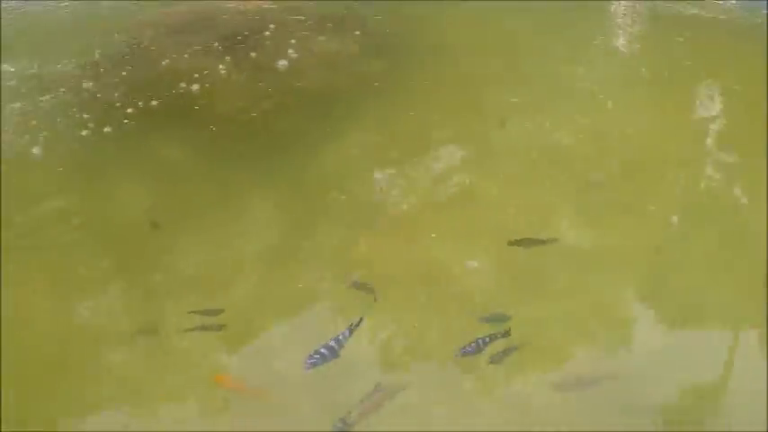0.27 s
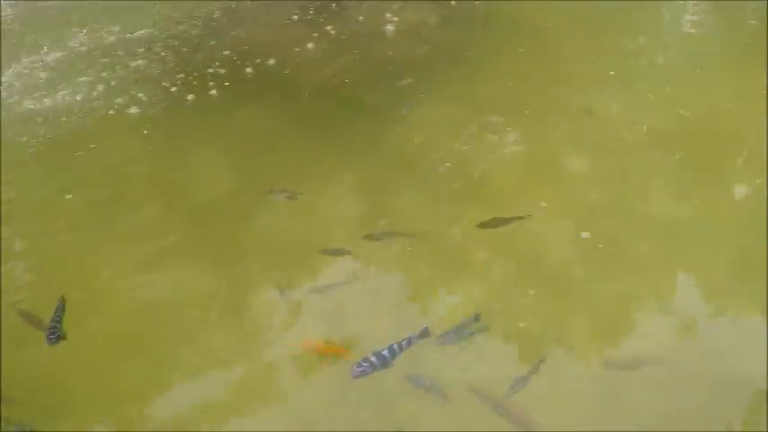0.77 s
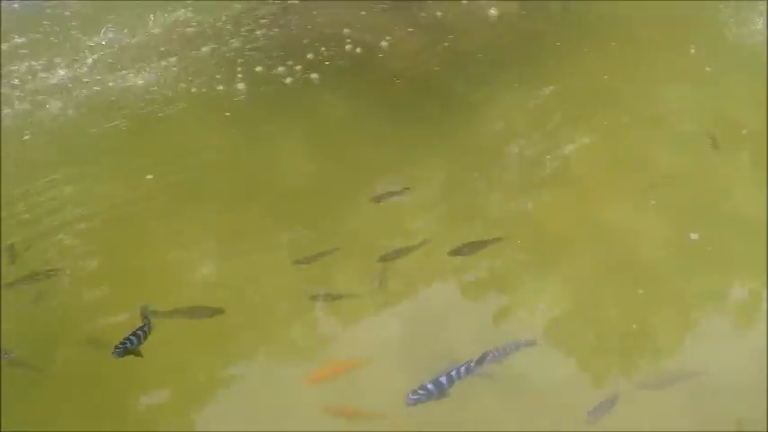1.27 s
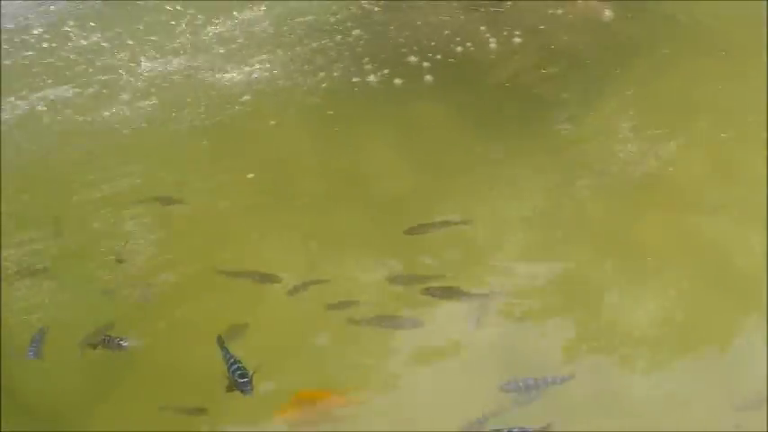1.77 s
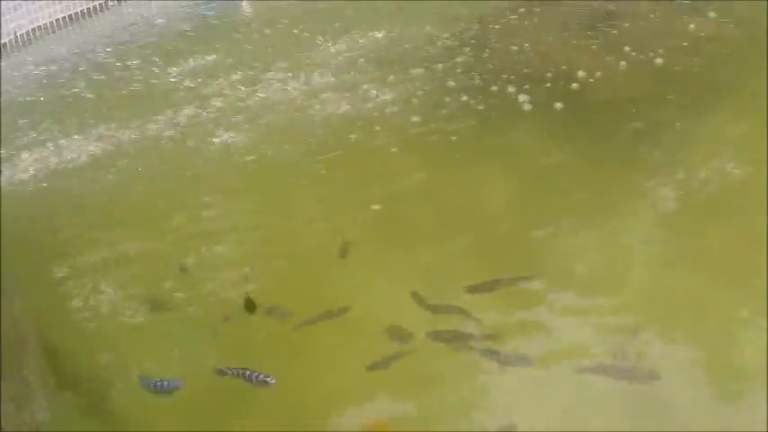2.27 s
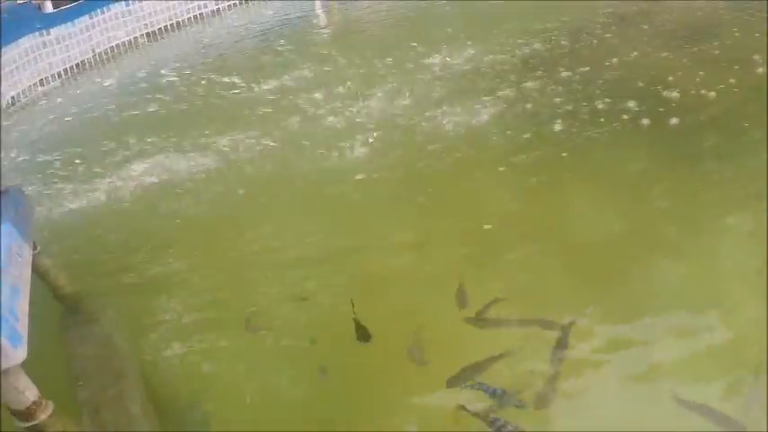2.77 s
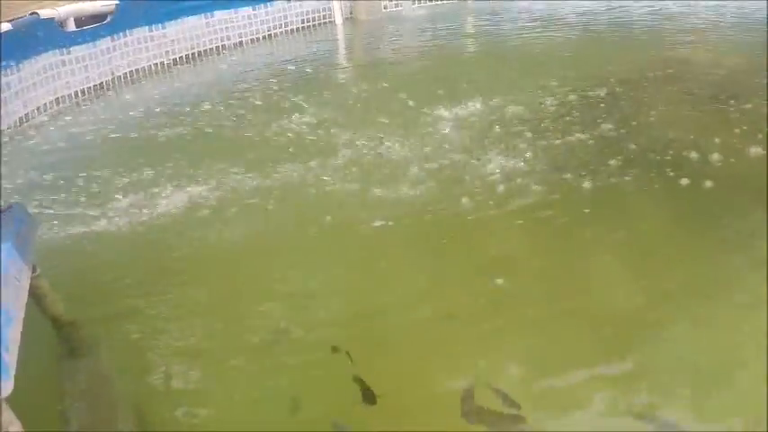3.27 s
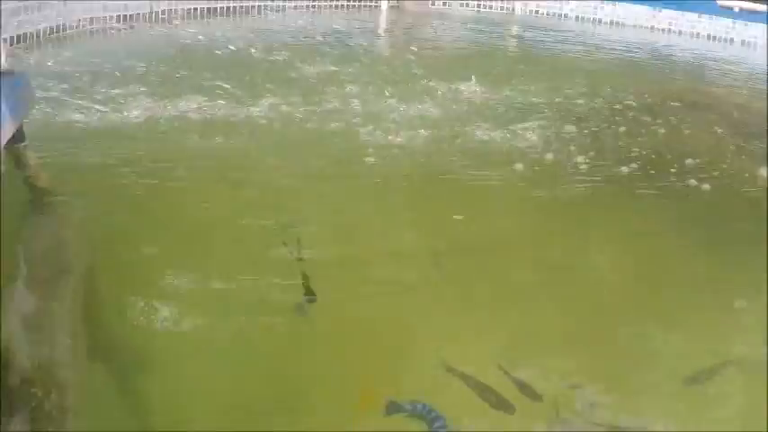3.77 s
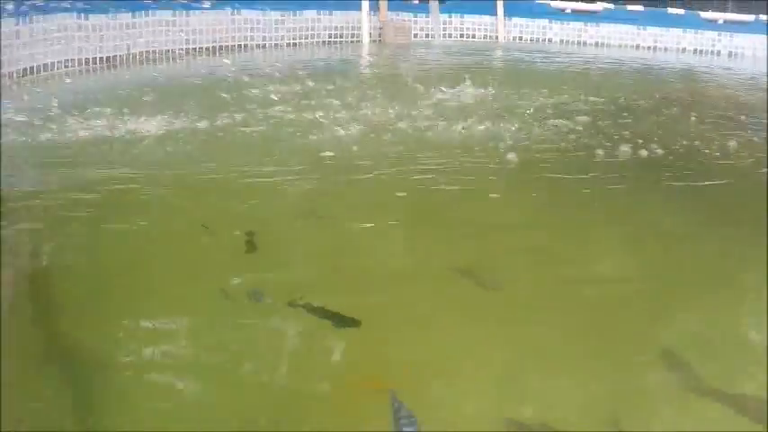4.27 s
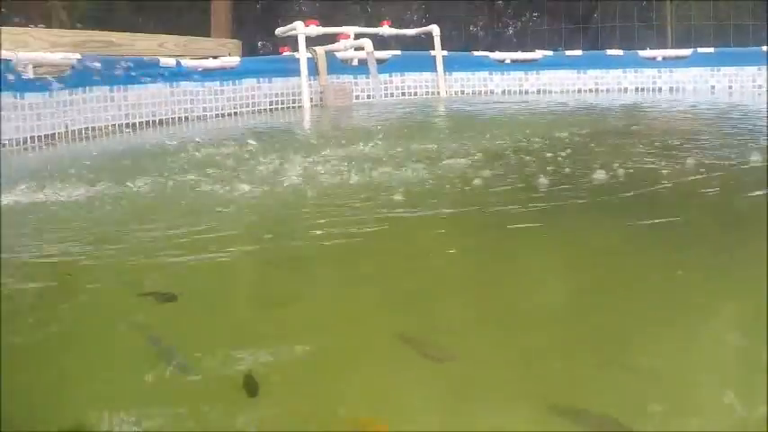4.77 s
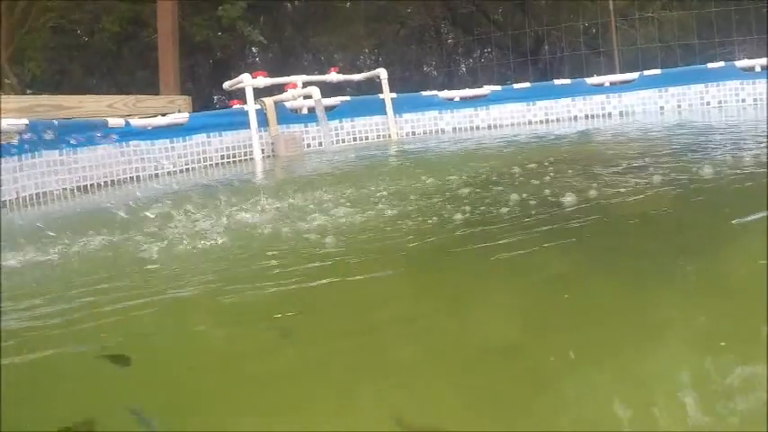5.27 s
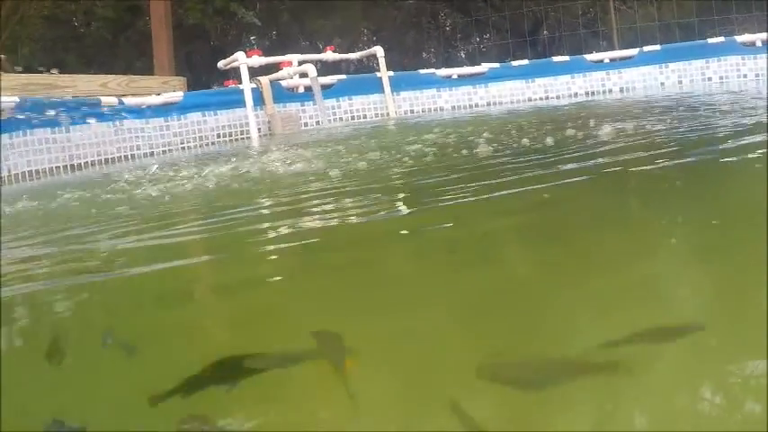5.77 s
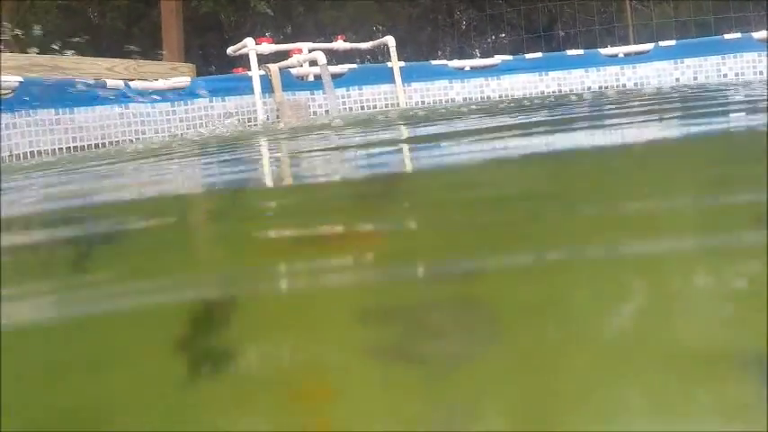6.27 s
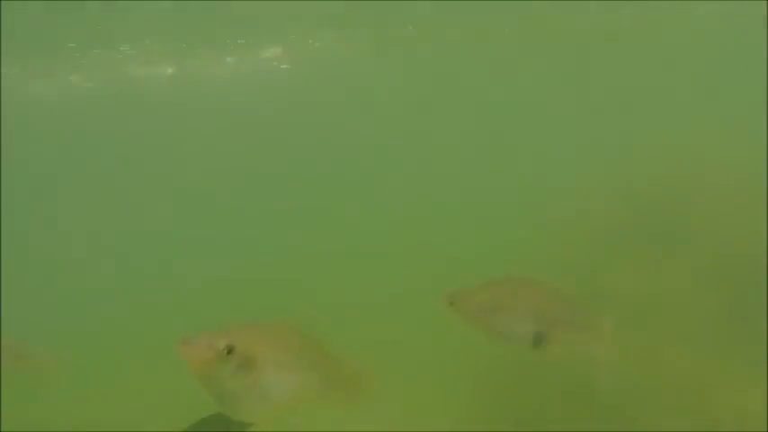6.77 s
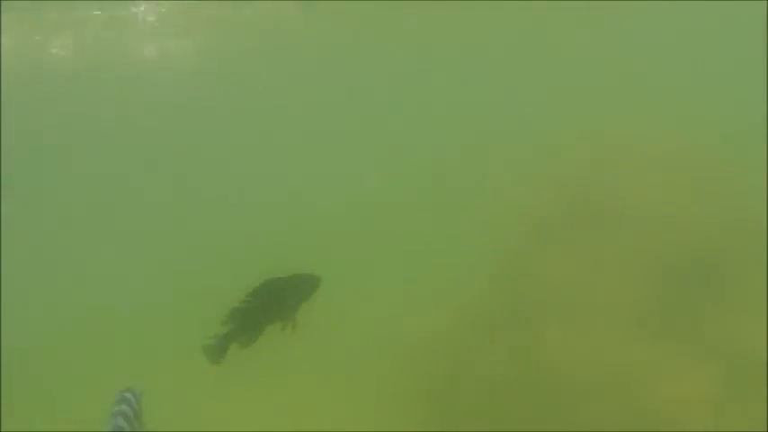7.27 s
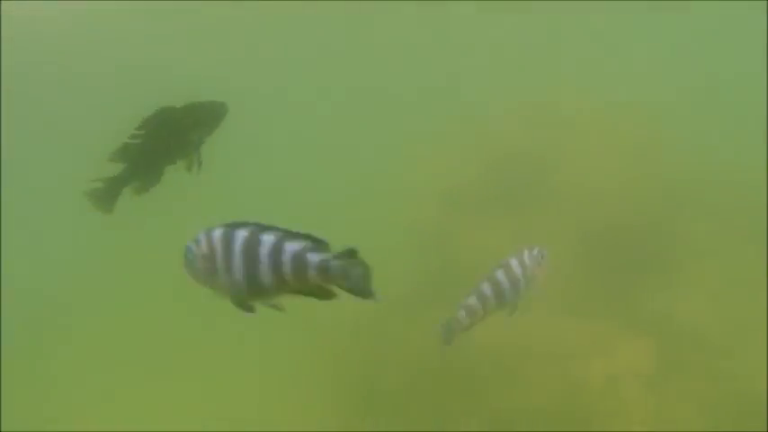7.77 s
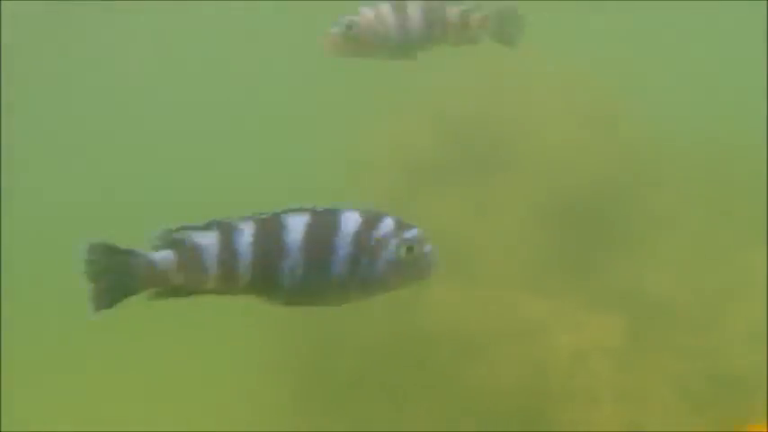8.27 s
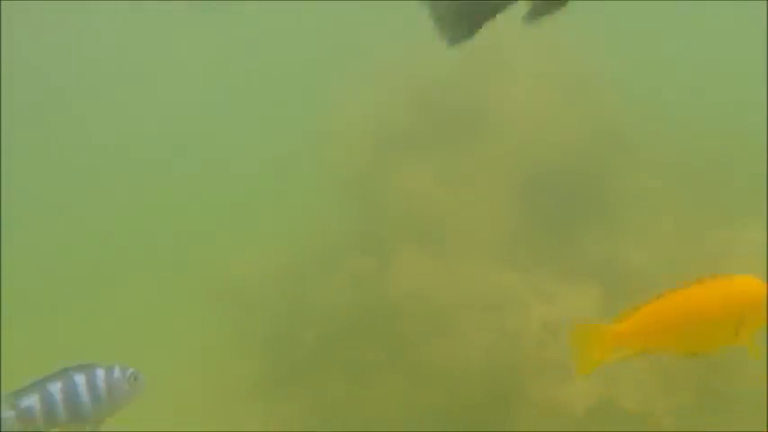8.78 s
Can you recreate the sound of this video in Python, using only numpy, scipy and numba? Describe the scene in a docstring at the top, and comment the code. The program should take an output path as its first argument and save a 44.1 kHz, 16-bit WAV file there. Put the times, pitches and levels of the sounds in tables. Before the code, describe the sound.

Quiet pond splashing and handling thumps build to a hard slapping, gurgling plunge, then dull underwater rumble with soft bubbles and a few knocks.

```python
"""A hand-held pole sways, shakes and knocks as it lowers a small camera in a sealed plastic case into a pond.
Sines and low noise make the pole; each knock is a thump, panel ring and crack in the case's modes.
Splashing from pipes is shaped noise and ringing drops, skin rubs in tiny slips and a far pump hums.
Water slaps, snaps and gurgles as noise bursts and blips; short rising tones are bubbles, case rings and a snap.
Below, the panels ring lower and the splash is dull."""
import sys
import numpy as np
from scipy import signal
from scipy.fft import rfft, irfft, next_fast_len
from scipy.io import wavfile
from numba import njit

SR = 44100
rng = np.random.default_rng(int(sys.argv[2]) if len(sys.argv) > 2 else 0)


def bounce(signal):
    """Save signal as a 16-bit WAV file at the path given by the first command-line argument."""
    frames = np.transpose(np.atleast_2d(signal))
    limited = np.clip(frames, -1, 1)
    pcm = np.round(limited * 32767).astype(np.int16)
    wavfile.write(sys.argv[1], SR, pcm)


N = 397341
T = np.arange(N) / SR

# All table levels are relative, before each layer's own trims.
# The hand on the pole, joined by lines: t/s, sway level/dB, tremor level/dB
HAND_MOTION = [(0, -57.5, -75.5), (1.9, -57.5, -77), (2.3, -53, -69.5), (2.85, -53, -69.5), (3.0, -42, -54),
               (3.15, -51, -61), (3.4, -51, -57), (3.7, -51, -69.5), (3.89, -45, -37), (4.12, -50.5, -63.5),
               (4.8, -50.5, -73), (5.2, -43, -53), (5.55, -51.5, -46.5), (5.87, -29, -43.5),
               (6.05, -65, -49), (6.2, -49, -38.5), (6.4, -49, -62), (7.3, -48.5, -63), (7.5, -58, -71),
               (7.85, -50.5, -58), (8.5, -45, -84), (8.8, -44.5, -55), (8.9, -41.5, -45.5),
               (9.01, -46.5, -49)]
# Skin sliding on the pole: start t/s, length/s, level/dB
SKIN_SLIDES = [(3.34, .29, -65), (3.845, 0.11, -60), (4.041, 0.058, -63), (4.944, 0.26, -59),
               (5.197, 0.27, -57.5), (5.508, 0.054, -56.5), (5.623, .31, -60.5), (6.123, 0.17, -67.5)]
# Spectrum of the rubbing skin: f/Hz, level/dB
RUB_SPECTRUM = [(180, -27), (300, -5.5), (606, -7), (749, -2), (857, 0), (1350, 2), (1650, 0), (3000, -1),
                (3900, -39), (6600, -120)]
# Ringing modes of the plastic case: dry f/Hz, level/dB, dry t60/s
CASE_MODES = [(505, 5, 0.043), (756, 5, 0.039), (1080, 6.5, 0.036), (1466, 5.5, 0.019), (1753, -1, 0.04),
              (2316, 11.5, 0.0046), (3300, 4, 0.015)]
# Spectrum of the splash through air: f/Hz, level/dB
AIR_SPECTRUM = [(150, -18), (250, -10.5), (913, -18), (1760, -10), (2060, -11.5), (3510, 1), (4870, -11.5),
                (6650, -12.5), (12600, -34), (15500, -16.5)]
# Resonant humps on the splash through air: f/Hz, width/Hz, level/dB
AIR_HUMPS = [(1760, 79, 9), (2306, 90, 8.5), (2640, 230, 1), (3370, 83, 3), (5730, 130, 5), (6660, 61, 6.5),
             (10240, 1530, 8), (12360, 1800, 12.5)]
# Spectrum of the splash through water: f/Hz, level/dB
WATER_SPECTRUM = [(150, -70), (250, 4), (1120, -26), (1590, -2), (1990, -9), (2950, -2.5), (4960, -12),
                  (5600, -6.5), (13700, -28.5), (15500, -19)]
# Resonant humps on the splash through water: f/Hz, width/Hz, level/dB
WATER_HUMPS = [(642, 94, 17), (1500, 530, 6.5), (2990, 600, 3.5), (5510, 140, 10), (7340, 430, 4),
               (9370, 220, 6.5), (13600, 4200, 15)]
# Splash heard through the water, joined by lines: t/s, level/dB
SPLASH_WATER_LEVEL = [(6.9, -65.5), (7.3, -69), (7.5, -72.5), (7.75, -68.5), (8.0, -66.5), (9, -66)]
# Knocks on the pole: t/s, crack level/dB, thump level/dB, thump f/Hz, panel level/dB
POLE_KNOCKS = [(1.091, -64, -53.5, 31.7, -75.5), (2.167, -67, -59, 71, -71), (2.33, -75, -44, 68, -70),
               (2.43, -75, -46, 46.7, -68.5), (2.56, -74, -49.5, 61.4, -79), (2.64, -74, -48.5, 61.4, -74),
               (2.699, -72, -44, 52.3, -72), (2.821, -74, -47, 59.3, -87), (3.036, -59, -32, 47.4, -73),
               (3.077, -55, -58, 38.5, -70), (3.165, -63, -41, 48.9, -68), (3.24, -56.5, -43, 45.9, -60.5),
               (3.345, -60, -56, 41.8, -61), (3.733, -48.5, -26.5, 40, -61), (3.789, -49, -28.5, 39.8, -54),
               (3.863, -35, -54, 44.3, -51), (3.878, -36, -32, 31.3, -38.5),
               (3.9, -21.5, -15.5, 42.8, -32.5), (4.444, -45.5, -38.5, 45.8, -46),
               (4.882, -60, -67, 33, -87), (4.942, -30.5, -18.5, 55, -37), (5.27, -60, -47, 50, -51.5),
               (5.332, -40.5, -39, 66.3, -52), (5.491, -54, -33.5, 42.6, -50), (5.579, -68, -29, 31.7, -68),
               (5.633, -31, -32, 50.3, -43.5), (5.772, -60, -27.5, 55.6, -48.5),
               (5.871, -21.5, -21.5, 52.6, -39.5), (6.054, -20, -24.5, 46.3, -22.5),
               (6.16, -47, -33.5, 103, -40.5), (7.391, -47, -25, 78.2, -23), (7.404, -31, -16.5, 45.8, -37),
               (7.535, -48, -42, 37.4, -52.5), (7.734, -44.5, -34, 47, -39.5),
               (7.85, -52, -42.5, 60.6, -42.5)]
# Short rising tones at the case (bubbles, case ringing and a bright snap): t/s, level/dB, starting f/Hz
CASE_TONES = [(4.883, -33, 3600), (5.616, -40.5, 1000), (5.761, -36, 930), (5.811, -35, 690),
              (5.824, -32, 1020), (5.823, -31.5, 5600), (5.871, -31, 960), (5.899, -25, 1940),
              (5.915, -34, 1800), (5.933, -31, 1970), (5.951, -27, 800), (5.959, -23.5, 4470),
              (5.964, -31.5, 2620), (6.018, -26.5, 926), (6.023, -27, 3660), (6.04, -22.5, 980),
              (6.055, -18.5, 530), (6.066, -22.5, 4490), (6.076, -21.5, 2310), (6.102, -36, 1080),
              (6.131, -40, 2490), (6.184, -39, 695), (6.226, -25, 745), (6.286, -41, 2020),
              (6.444, -40, 2020), (6.462, -47, 487), (6.579, -50, 915), (6.678, -43.5, 2020),
              (6.699, -51, 900), (6.749, -41.5, 2000), (6.797, -44, 3200), (6.846, -42, 1810),
              (6.894, -52, 504), (6.933, -47.5, 470), (6.968, -38.5, 1630), (6.995, -38, 3860),
              (7.392, -17.5, 546), (7.415, -34, 562), (7.438, -39, 566), (7.76, -37.5, 488),
              (7.826, -35, 1280), (7.837, -41.5, 484), (7.997, -44.5, 585), (8.016, -48.5, 570),
              (8.039, -48, 450), (8.28, -50.5, 790), (8.421, -42, 610), (8.7, -38, 553),
              (8.758, -45.5, 606), (8.816, -47, 1930), (8.826, -47, 1950), (8.839, -48.5, 600),
              (8.893, -43, 468), (8.909, -44, 565), (8.924, -44, 556)]
# Gurgle at the case, joined by lines: t/s, level/dB
GURGLE_LEVEL = [(5.35, -105), (5.55, -71.5), (5.85, -53), (6.1, -59.5), (6.32, -76), (6.6, -77.5),
                (6.9, -67), (7.05, -87), (7.45, -77), (7.65, -86.5), (8.1, -79), (8.6, -80), (8.9, -69),
                (9, -67.5)]
# Water slapping the case: t/s, level/dB
WATER_SLAPS = [(5.787, -29), (5.822, -36), (5.899, -23), (5.933, -31), (5.958, -30), (6.017, -28),
               (6.023, -22), (6.039, -27), (6.055, -27), (6.066, -33), (6.076, -23), (6.169, -37),
               (6.184, -37.5), (6.226, -30.5), (6.286, -43), (6.419, -44), (6.445, -43.5), (6.749, -45),
               (6.779, -43.5), (6.967, -38), (6.994, -29), (7.415, -32), (7.438, -42.5), (7.826, -41),
               (8.136, -46), (8.479, -47), (8.893, -44)]
# Bright snaps of water at the seams: t/s, level/dB
SEAM_SNAPS = [(5.822, -54), (5.987, -44), (6.007, -41), (6.066, -36), (6.169, -35.5), (6.244, -29.5),
              (6.286, -44), (6.419, -48), (6.445, -28), (6.796, -38), (6.844, -37), (6.994, -12.5),
              (8.479, -42), (8.7, -45)]

# the case touches the water, is covered, then the microphone port floods
TOUCH_S, COVER_S, SUNK_S = 6.0, 0.04, 6.89
# water slows the pole
SWAY_DRY_HZ, SWAY_WET_HZ = 43.4, 34.15
SHUDDER_DB, PANEL_DRIVE_DB = -2, -48.5   # against the tremor
SLIDE_RISE_S, SLIDE_FALL_S, SKIN_REST_DB = 0.013, 0.0075, -79
RUB_RING_WIDTH_HZ, RUB_RING_DB = 61, 5.5   # the slips make the case modes sing
# splash through air, louder as the pole turns to the pipes
SPLASH_FAR_DB, SPLASH_NEAR_DB, NEARING_S = -67, -61, 3.28
# water creeps over the port and shuts out part of the treble
CLOSING_S, CLOSING_OVER_S, CLOSING_HZ, CLOSING_SHARE = 6.62, 0.18, 4100, 0.34
PUMP_HZ, PUMP_AIR_DB, PUMP_WATER_DB = 120, -76, -62
# water load lowers and damps the panels; the first sags on with depth
PANEL_DRY_HZ, PANEL_WET_HZ, PANEL_SAG_HZ_PER_S = 187.8, 128.3, 4.3
SECOND_DRY_HZ, SECOND_WET_HZ, SECOND_PANEL_DB = 237.2, 217.5, -6
PANEL_DRY_T60_S, PANEL_WET_T60_S = 0.31, 0.17   # first panel
FLOODED_PITCH = 0.72   # pitch factor of the case modes once sunk
# t60 at the reference level; harder thumps die sooner: dB of t60 lost per dB
THUMP_T60_S, THUMP_REF_DB, THUMP_SHORTENS = 0.27, -31.5, 0.36
RATTLE_S = 0.0039   # decay time constant
# t60 at the reference pitch; higher case tones die sooner
TONE_T60_S, TONE_REF_HZ, TONE_LAW = 0.033, 1000, 0.43
DEEP_RING = 1.4   # case tones ring this much longer deep under
RISE, DEEP_RISE = 0.042, 0.22   # share of its pitch a case tone climbs in half its t60
MUFFLED_S, MUFFLED_HZ = 7.1, 3000   # deep under, water dulls knocks, case tones and slaps
CLIP_LEVEL, CUTOFF_HZ = .19, 15900   # ceiling of the swings (1 = full scale); top of the treble


def from_db(db):
    """Decibels to gain."""
    return 10 ** (np.asarray(db) / 20)


def rms_one(x):
    """Scale to rms 1."""
    return x / np.sqrt(np.mean(x ** 2) + 1e-20)


def in_time(rows):
    """Columns of a table joined by straight lines in time."""
    s, *columns = np.transpose(rows)
    return [np.interp(T, s, c) for c in columns]


def step(s, over_s):
    """A soft step from 0 to 1 centred on time s."""
    return .5 + .5 * np.tanh((T - s) / (2 * over_s))


def covered(dry, wet):
    """A quantity that passes from its dry to its wet value as the water covers the case."""
    return dry + (wet - dry) * step(TOUCH_S, COVER_S)


def wetness():
    """0 with the microphone port in air, 1 once it has flooded."""
    return step(SUNK_S, 0.03)


def filtered(x, order, hz, kind="low"):
    """Butterworth filter at hz, or between two edges."""
    return signal.sosfilt(signal.butter(order, hz, kind, fs=SR, output="sos"), x)


def drift(rate):
    """Slow random wander of rms 1, smoothed more at lower rates."""
    r = np.exp(-80 * np.pi * rate / SR)   # one point per 40 samples
    slow = signal.lfilter([1], [1, -2 * r, r * r], rng.standard_normal(N // 40 + 2002))[2000:]
    return np.interp(np.arange(N) / 40, np.arange(len(slow)), rms_one(slow))


def coloured(x, spectrum, peaks=()):
    """Give x a spectrum with resonant humps; rms 1."""
    size = next_fast_len(N)
    hz = np.maximum(np.arange(size // 2 + 1) * SR / size, 1)
    spectrum_hz, spectrum_db = np.transpose(spectrum)
    db = np.interp(np.log(hz), np.log(spectrum_hz), spectrum_db)
    for centre_hz, width, peak_db in peaks:
        db = db + peak_db / (1 + (2 * (hz - centre_hz) / width) ** 2)
    return rms_one(irfft(rfft(x, size) * from_db(db), size)[:N])


def grains(per_s, spread_db):
    """Random clicks of uneven size; rms 1."""
    sizes = from_db(spread_db * np.minimum(rng.exponential(1, N), 5)) * rng.choice([-1, 1], N)
    return rms_one(sizes * (rng.random(N) < per_s / SR))


@njit
def ring(force, turn, r):
    """A mode whose pitch and loss may move; a unit click rings at height 1."""
    out, state = np.zeros(len(force)), 0j
    for i in range(len(force)):
        state = state * r[i] * np.exp(1j * turn[i]) + force[i]
        out[i] = state.imag
    return out


def mode(force, hz, t60):
    """Ring a mode of given pitch and decay."""
    return ring(force, 2 * np.pi * hz / SR, from_db(-60 / (t60 * SR)))


def add(out, s, sound):
    """Mix a short sound in at time s."""
    at = round(s * SR)
    out[at:at + len(sound)] += sound[:N - at]


def pole():
    """The pole sways at an unsteady pitch over a looser shake; faster shudders ride above."""
    sway_db, tremor_db = in_time(HAND_MOTION)
    sway_hz = covered(SWAY_DRY_HZ, SWAY_WET_HZ) * from_db(drift(12.26))
    sway = np.sin(2 * np.pi * np.cumsum(sway_hz) / SR)
    white = rng.standard_normal((2, N))
    shake = rms_one(filtered(white[0], 3, [16, 55], "band"))
    shudder = rms_one(filtered(white[1], 3, [55, 105], "band"))
    swaying = from_db(sway_db + 3.5) * (1.1 * sway + 0.67 * shake)
    return swaying + from_db(tremor_db + SHUDDER_DB + 2.8 * drift(18)) * shudder


def rubbing():
    """Skin slides on the pole in tiny slips: each slide rises, holds and stops."""
    level = from_db(SKIN_REST_DB) * (1 - wetness())
    for s, length, db in SKIN_SLIDES:
        held = step(s, SLIDE_RISE_S) * (1 - step(s + length, SLIDE_FALL_S))
        level = level + from_db(db) * held
    humps = [(hz, RUB_RING_WIDTH_HZ, RUB_RING_DB) for hz, *_ in CASE_MODES]
    slips = coloured(grains(2500, 2.0), RUB_SPECTRUM, humps)
    return level * from_db(2.0 * drift(33)) * slips


def droplets(per_s, low_hz, high_hz, cycles, spread_db, tilt):
    """Random drops, each ringing for some cycles at one of 16 pitches."""
    clicks, dealt = grains(per_s, spread_db) + 1e-18, rng.integers(0, 16, N)
    out = 0
    for k, hz in enumerate(np.geomspace(low_hz, high_hz, 16)):
        r, w = from_db(-60 * hz / (cycles * SR)), 2 * np.pi * hz / SR
        drop = signal.lfilter([0, np.sin(w)], [1, -2 * r * np.cos(w), r * r], clicks * (dealt == k))
        soft = r ** 4   # a wider twin resonance rounds the onset
        twin = [1, -2 * soft * np.cos(w), soft * soft]
        out = out + hz ** tilt * signal.lfilter([1 - soft], twin, np.sin(w) * drop)
    return rms_one(out)


def splash():
    """Hiss and ringing drops, heard through the port in air, then through the walls under water."""
    wet, whiten = wetness(), [1, -.5]   # whiten tips the drops toward the treble
    air_drops = signal.lfilter(whiten, 1, droplets(500, 1258, 8900, 28.0, 2.44, 0.36))
    water_drops = signal.lfilter(whiten, 1, droplets(300, 992, 9800, 28.0, 4.3, 0.58))
    air = coloured(rng.standard_normal(N) + 0.76 * air_drops, AIR_SPECTRUM, AIR_HUMPS)
    water = coloured(rng.standard_normal(N) + 0.85 * water_drops, WATER_SPECTRUM, WATER_HUMPS)
    closing = CLOSING_SHARE * step(CLOSING_S, CLOSING_OVER_S)
    shut = signal.sosfiltfilt(signal.butter(6, CLOSING_HZ, fs=SR, output="sos"), air)
    air = (1 - closing) * air + closing * shut
    air_db = np.interp(T, [0, NEARING_S], [SPLASH_FAR_DB, SPLASH_NEAR_DB])
    water_db = in_time(SPLASH_WATER_LEVEL)[0]
    through_air = (1 - wet) * from_db(air_db + 1.74 * drift(26)) * air
    return through_air + wet * from_db(water_db + 1.7 * drift(18)) * water


def pump():
    """A far pump hums as a sine; the water carries it stronger and less steadily."""
    water_gain_db = PUMP_WATER_DB - PUMP_AIR_DB + 5.6 * drift(4)
    return from_db(PUMP_AIR_DB + wetness() * water_gain_db) * np.sin(2 * np.pi * PUMP_HZ * T)


def knocks():
    """Each knock is a rattling crack in the case, a kick to its panels and a thump that builds within a cycle."""
    thumps, kicks, cracks, t = np.zeros(N), np.zeros(N), np.zeros(N), T[:SR // 2]
    rattle = rng.standard_normal((len(POLE_KNOCKS), 3000))
    for (s, crack_db, thump_db, hz, panel_db), noise in zip(POLE_KNOCKS, rattle):
        t60 = THUMP_T60_S * from_db(THUMP_SHORTENS * (THUMP_REF_DB - thump_db))
        swell = (1 - np.exp(-t / 0.0053)) * from_db(-60 * t / t60)
        # thump and kick follow the crack by 2.5 ms
        add(thumps, s + 0.0025, -from_db(thump_db + 6.5) * swell * np.sin(2 * np.pi * hz * t))
        add(kicks, s + 0.0025, -from_db(panel_db + 6.5) * np.hanning(90) / 45)
        add(cracks, s, from_db(crack_db - 33) * noise * np.exp(-t[:3000] / RATTLE_S))
    # the grip never rests
    tremor = rms_one(filtered(grains(90, 4.0), 2, 120))
    kicks = kicks + from_db(in_time(HAND_MOTION)[1] + PANEL_DRIVE_DB + 3.3 * drift(4.8)) * tremor
    return thumps + panel_ring(kicks) + case_ring(filtered(cracks, 3, [560, 2800], "band"))


def panel_ring(kicks):
    """Two panel modes ring to the kicks; the water load lowers and damps them."""
    first_hz = covered(PANEL_DRY_HZ, PANEL_WET_HZ) - PANEL_SAG_HZ_PER_S * np.maximum(T - TOUCH_S, 0)
    second_hz = covered(SECOND_DRY_HZ, SECOND_WET_HZ)
    t60 = covered(PANEL_DRY_T60_S, PANEL_WET_T60_S)
    second = from_db(SECOND_PANEL_DB) * mode(kicks, second_hz, 0.77 * t60)
    return filtered(mode(kicks, first_hz, t60) + second, 4, 310)


def case_ring(cracks):
    """The case modes ring to the cracks, lower and shorter once sunk."""
    load = 1 - (1 - FLOODED_PITCH) * wetness()
    return sum(from_db(db) * mode(cracks, hz * load, t60 * load ** 2) for hz, db, t60 in CASE_MODES)


def case_tones():
    """Bubbles, case ringing and a bright snap: short decaying tones of rising pitch, blurred by band noise."""
    out, t = np.zeros(N), T[:SR // 8]
    noise = rng.standard_normal((len(CASE_TONES), len(t)))
    for (s, db, hz), blur in zip(CASE_TONES, noise):
        longer, rise = (DEEP_RING, DEEP_RISE) if s > MUFFLED_S else (1, RISE)
        t60 = TONE_T60_S * (TONE_REF_HZ / hz) ** TONE_LAW * longer
        fade = from_db(-60 * t / t60) * (1 - np.exp(-t * hz / 0.12))
        tone = np.sin(2 * np.pi * hz * (t + rise * t ** 2 / t60))
        blur = rms_one(filtered(blur, 1, [hz / 1.4, hz * 1.6], "band"))
        add(out, s, from_db(db) * fade * (0.57 * tone + 0.087 * blur))
    return out


def gurgle():
    """Small bubbles slip off the case, each a short soft blip, in a wash of slopping water; the level wavers."""
    out, t = np.zeros(N), T[:SR // 30]
    for when, size, loud, lasting in rng.random((1500, 4)):
        hz = 430 * 7.06 ** (size ** 1.16)
        length = 0.8 / hz * (1 + 3.5 * lasting ** 2)
        blip = np.sin(2 * np.pi * hz * (t + 0.015 * t ** 2 / length))
        add(out, 5.5 + 3.5 * when, from_db(-16 * loud) * blip * t / length * np.exp(-t / length))
    slosh = filtered(rng.standard_normal(N), 2, [330, 1400], "band")
    slosh = rms_one(slosh * from_db(3.0 * drift(30)))
    wash = rms_one((rms_one(out) + slosh) * from_db(4.0 * drift(14)))
    return from_db(in_time(GURGLE_LEVEL)[0]) * wash


def bursts(rows, low_hz, high_hz, peak_s):
    """Short bursts of noise in a band, each envelope at its height after peak_s."""
    out, t = np.zeros(N), T[:SR // 20] / peak_s
    noise = filtered(rng.standard_normal((len(rows), len(t))), 3, [low_hz, high_hz], "band")
    for (s, db), burst in zip(rows, noise):
        add(out, s, from_db(db) * burst * np.e * t * np.exp(-t))
    return out


def slaps():
    """Water slaps the case: mid-band bursts of noise."""
    return bursts(WATER_SLAPS, 800, 3100, peak_s=0.0014)


def snaps():
    """Water snaps at the seams: shorter, brighter bursts of noise."""
    return bursts(SEAM_SNAPS, 3600, 13800, peak_s=0.00063) * from_db(-11)


def scene():
    """Pole, case, water and a far pump."""
    struck = knocks() + case_tones() + slaps()
    struck = np.where(T < MUFFLED_S, struck, filtered(struck, 6, MUFFLED_HZ))
    return (pole() + rubbing() + splash() + pump() + struck + gurgle() + snaps())[None]


def record(dry):
    """The loudest swings flatten; the top is cut."""
    flat = dry / (1 + np.abs(dry / CLIP_LEVEL) ** 4) ** .25
    return signal.sosfilt(signal.cheby2(12, 70, CUTOFF_HZ, fs=SR, output="sos"), flat)


dry = scene()
out = record(dry)
bounce(out)
```